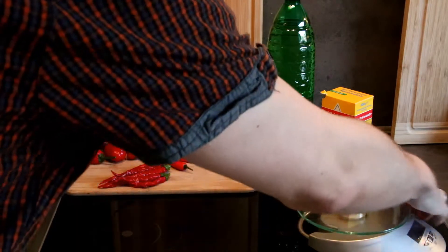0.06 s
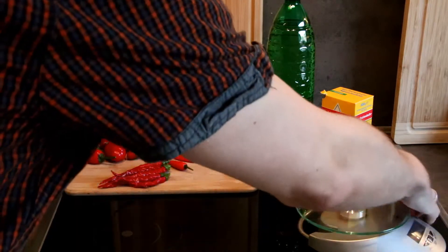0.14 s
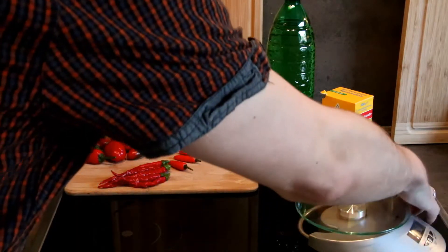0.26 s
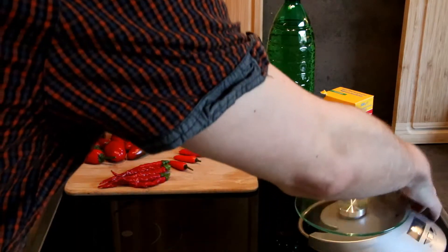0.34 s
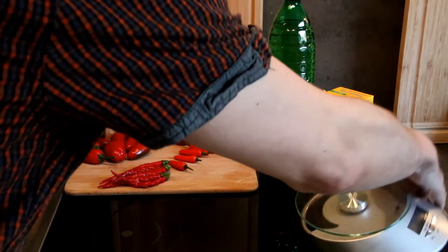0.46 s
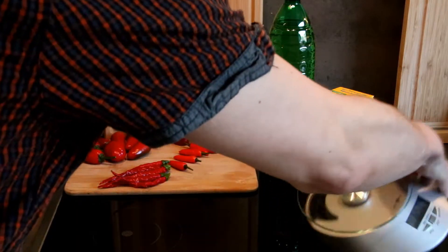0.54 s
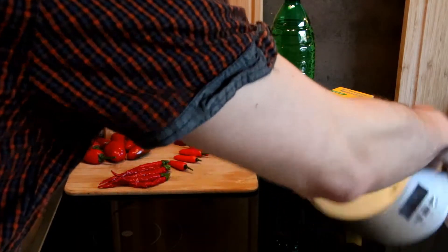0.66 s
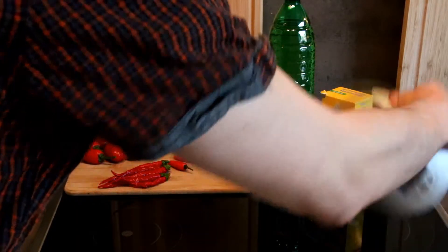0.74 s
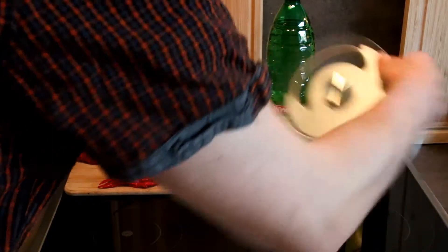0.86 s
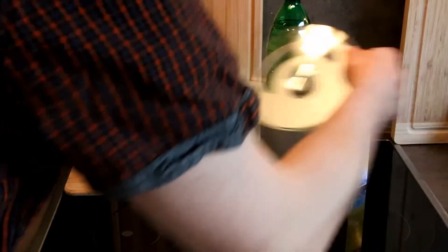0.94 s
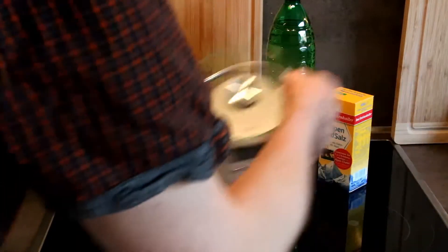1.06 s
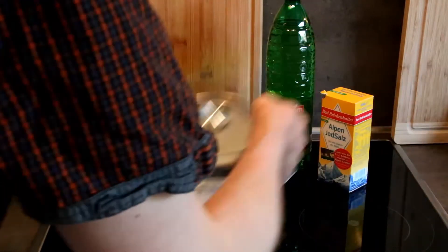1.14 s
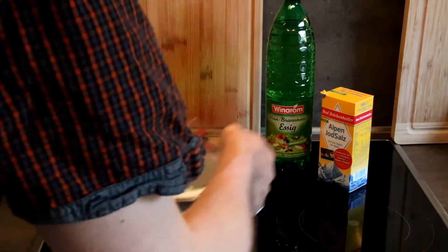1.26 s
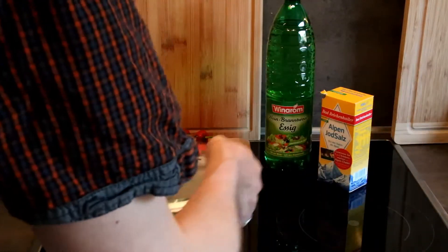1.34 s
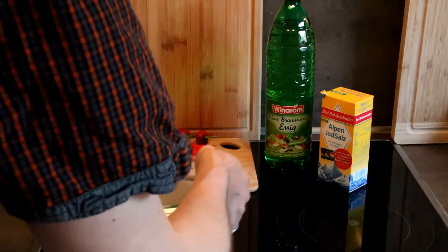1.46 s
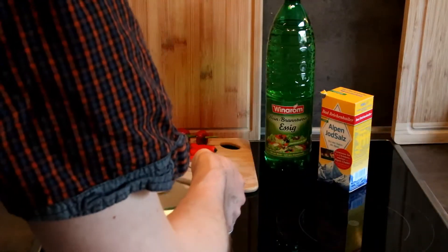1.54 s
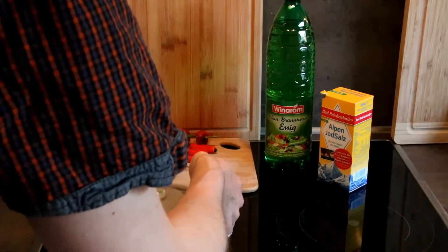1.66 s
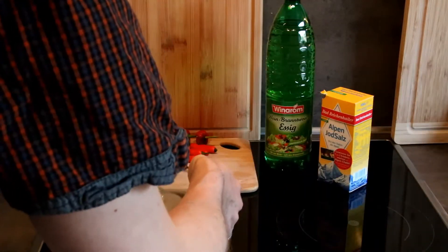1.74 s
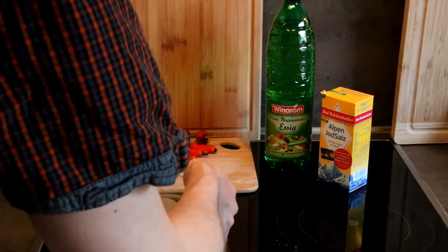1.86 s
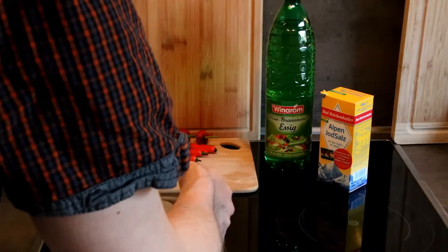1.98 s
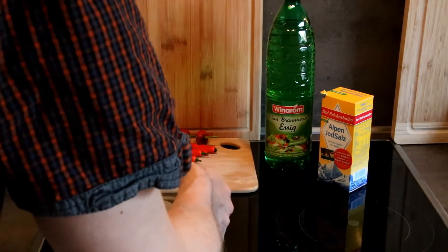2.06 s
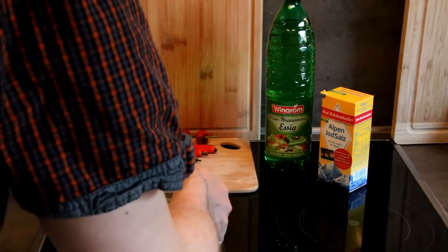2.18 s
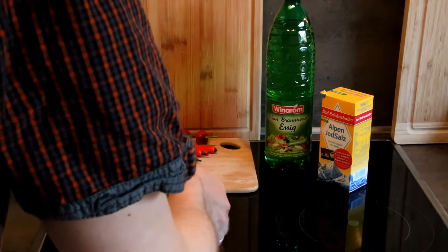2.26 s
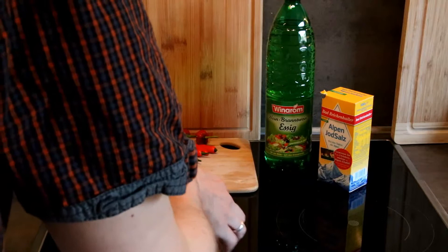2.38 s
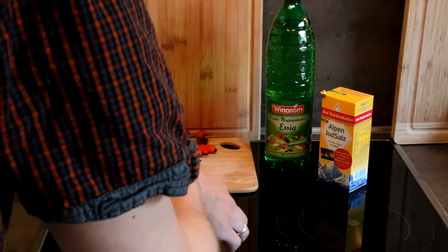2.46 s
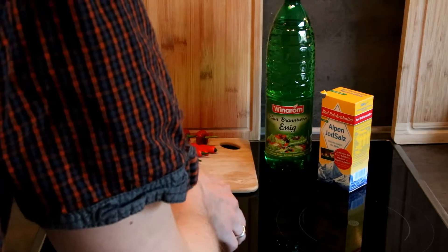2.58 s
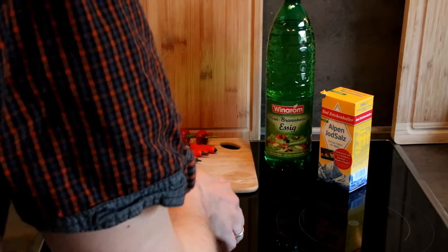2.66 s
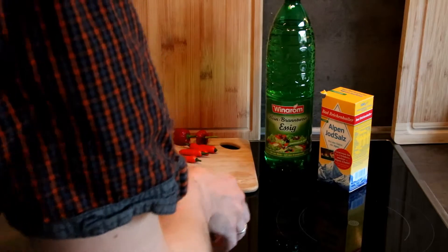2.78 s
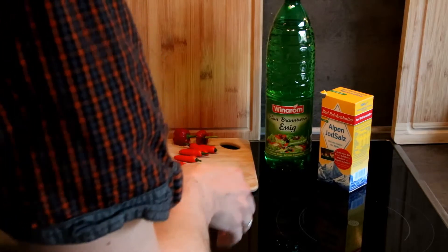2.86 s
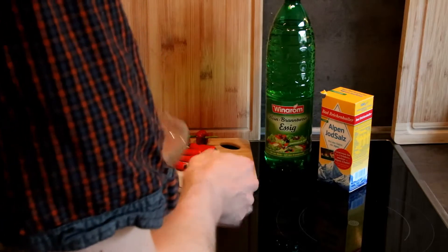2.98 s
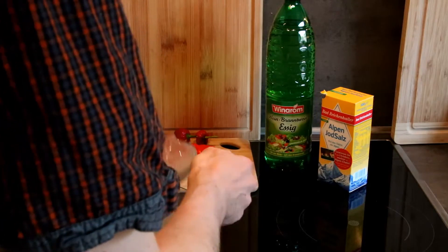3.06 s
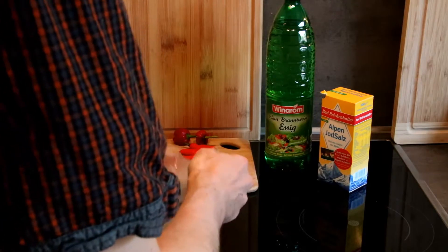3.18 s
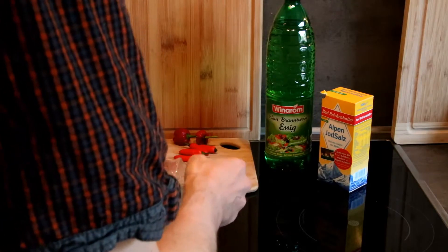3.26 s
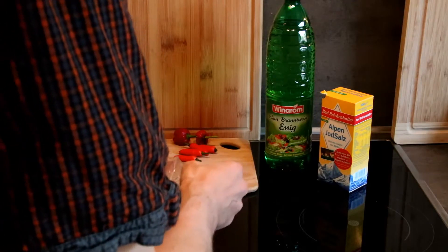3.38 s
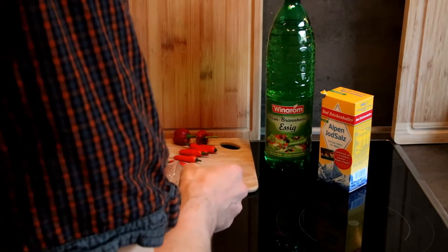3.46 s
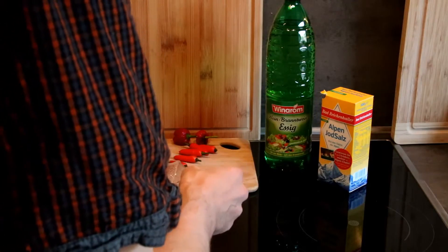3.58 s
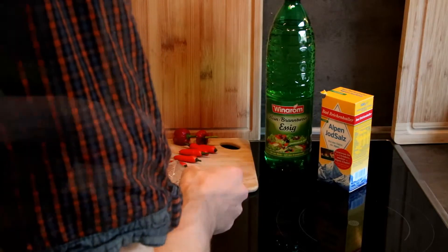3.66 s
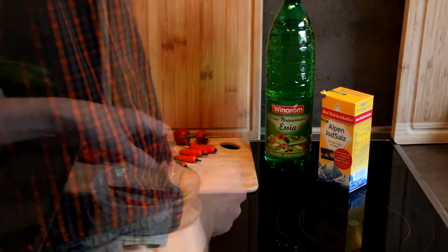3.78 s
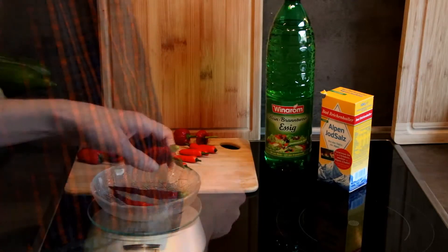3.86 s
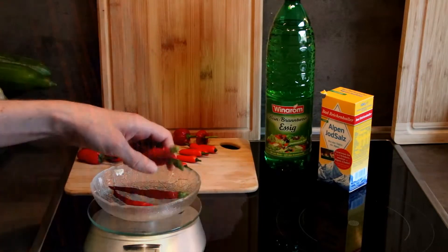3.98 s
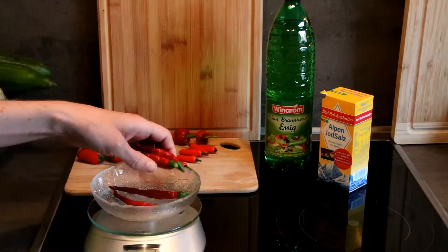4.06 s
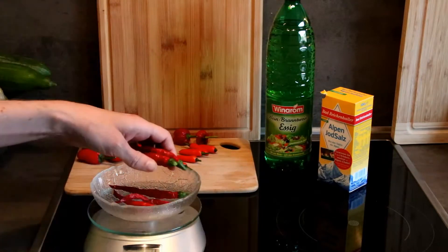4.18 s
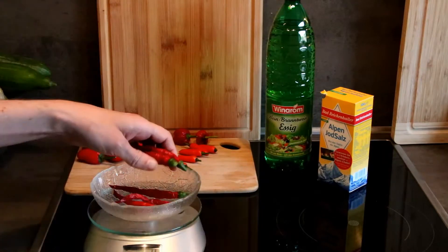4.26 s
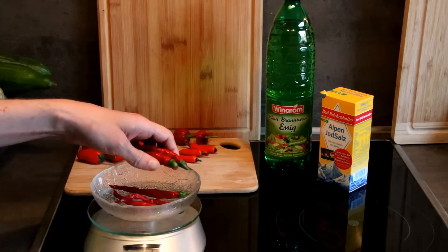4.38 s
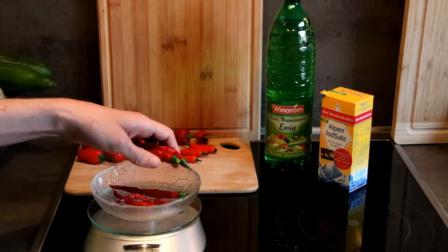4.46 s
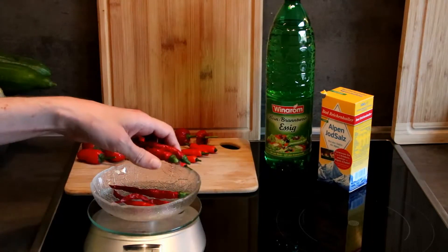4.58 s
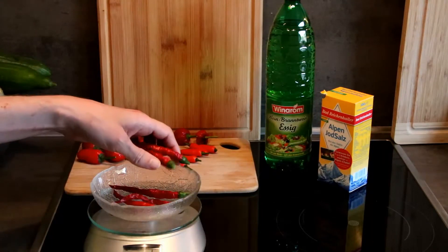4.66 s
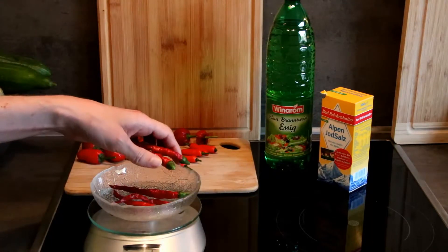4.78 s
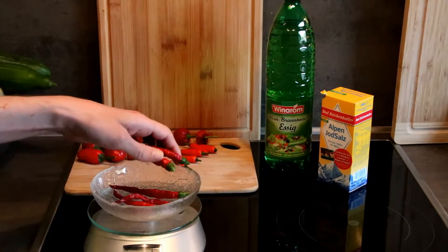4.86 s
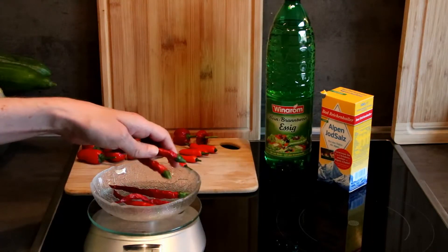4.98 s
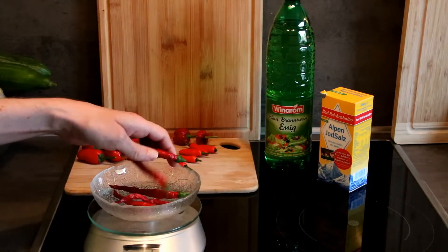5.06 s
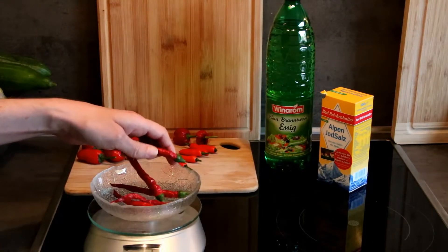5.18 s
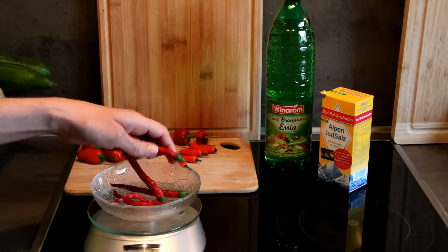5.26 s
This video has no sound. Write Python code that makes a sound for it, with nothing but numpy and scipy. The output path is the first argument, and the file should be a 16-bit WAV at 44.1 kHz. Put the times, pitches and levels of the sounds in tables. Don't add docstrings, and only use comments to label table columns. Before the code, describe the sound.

In a small, hard, quiet kitchen, sleeves rustle as a hand grips and lifts a kitchen scale with dull clunks. Its feet judder in two quick bursts on the glass hob with slight squeaks, then a sharp knock. A glass bowl lands loudly on the glass plate, rocks, buzzes and settles; light chilies tap inside. Close mono microphone, short room echoes.

```python
import sys
import numpy as np
from scipy import signal
from scipy.fft import rfft, irfft, next_fast_len
from scipy.io import wavfile
from scipy.ndimage import uniform_filter1d

SR = 44100
rng = np.random.default_rng(int(sys.argv[2]) if len(sys.argv) > 2 else 0)


def boost(x):
    u = np.asarray(x, float) / 20
    return 10 ** u


def put_to_file(sound):
    columns = np.atleast_2d(sound).T
    safe = np.clip(columns, -1, 1)
    whole_steps = np.round(safe * 32767)
    wavfile.write(sys.argv[1], SR, whole_steps.astype(np.int16))


N = 234727
SPLIT_HZ = 1300

# start_s, peak_db, brightness_db
GRIP_EVENTS = [(0.187, -46, -13), (0.224, -52, -6.5), (0.321, -37, -11.5), (0.334, -39, -17),
               (0.52, -45, -10), (0.536, -19.5, -22.5), (0.571, -34, -11), (0.832, -38.5, -13.5),
               (0.845, -41, -11), (0.966, -55, 3), (1.02, -41.5, -7.5), (1.509, -49, -16)]
LIFT_EVENTS = [
    (0.598, -20.5, -14),
]
TAP_EVENTS = [
    (1.659, -39, -13),
    (2.131, -21, -26),
    (3.077, -42.5, -12),
]
JUDDER_EVENTS = [(1.910, -25, -19), (1.919, -33, -28), (1.926, -22, -28), (1.931, -19.5, -29),
                 (1.934, -15, -35), (1.942, -18, -28), (1.946, -15.5, -31), (1.951, -21, -18.5),
                 (1.961, -29, -37), (1.970, -23.5, -32), (1.996, -42, -35), (2.189, -25.5, -30),
                 (2.193, -30.5, -33), (2.204, -23.5, -21), (2.209, -16, -26), (2.214, -14.5, -20),
                 (2.221, -14, -26.5), (2.227, -18, -25), (2.235, -15, -31), (2.243, -24.5, -22.5),
                 (2.250, -32.5, -23.5), (2.257, -25.5, -9), (2.264, -30.5, -21.5), (2.272, -23, -30),
                 (2.332, -39.5, 2.5)]
SET_DOWN_EVENTS = [
    (2.178, -37, -32),
    (2.3, -36, -32),
    (2.355, -31, -38),
]
SCALE_KNOCK_EVENTS = [
    (2.522, -37.5, -27),
    (2.542, -24, -45.5),
                      (2.547, -17.5, -4),
    (2.556, -13.5, -19),
    (2.951, -47.5, -12),
]
BOWL_LAND_EVENTS = [(3.479, -6, -7), (3.483, -11, -2.5), (3.496, -16, -34), (3.506, -42, -16.5),
                    (3.534, -14, -8.5), (3.56, -19.5, -12), (3.601, -14, -8), (3.655, -37.5, -3),
                    (3.671, -27, -28), (3.707, -28, -14), (3.715, -32.5, -7), (3.75, -42, -3.5),
                    (3.836, -51.5, -5), (4.057, -65.5, -1)]
BOWL_BUZZ_EVENTS = [
    (3.51, -34, 10.5),
    (3.62, -25.5, -13),
    (3.73, -34, 0),
]
CHILI_DROP_EVENTS = [
    (4.137, -52, -6),
                     (4.148, -29.5, -18.5),
    (4.16, -32, -7),
    (4.194, -36, -9.5),
]
CHILI_ROLL_EVENTS = [
    (4.812, -40, -17),
]
SETTLING_EVENTS = [
    (4.642, -70, -24),
    (4.809, -44, -21),
    (4.9, -45, -22),
    (4.99, -52.5, -12),
    (5.137, -50.5, -4.5),
    (5.147, -47, -30.5),
    (5.181, -46, -31),
    (5.22, -51, -16.5),
]

# start_s, hold_s, level_db, grit_db
SQUEAK_EVENTS = [
    (1.943, 0.0072, -47.5, -9),
    (2.186, 0.076, -57.5, -16),
]
# start_s, level_db
THUMP_EVENTS = [(0.32, -54), (0.335, -49.5), (0.573, -56), (1.965, -50), (1.993, -49), (2.066, -43.5),
                (2.128, -57), (2.238, -46), (2.333, -53), (2.522, -56), (2.544, -38.5), (2.687, -49),
                (3.082, -57), (3.478, -31.5), (3.656, -66), (4.198, -49.5), (5.149, -61.5)]
# start_s, level_db, brightness_db
RUSTLE_EVENTS = [(0.02, -61.5, -7), (0.27, -65, -7), (0.42, -60, -10), (0.91, -58.5, -5.5),
                 (1.05, -60.5, -5), (1.72, -65, -7.5), (2.72, -57.5, -2), (2.85, -58, -0.5),
                 (2.98, -62, -4.5), (4.13, -64.5, -8.5), (4.35, -65.5, -19), (4.83, -65, -12.5),
                 (5.16, -68.5, -2.5)]

# pitch_hz, level_db, t60_s
GRIPPED_MODES = [(333, -23, 0.081), (413.4, -3, 0.11), (511, 11, 0.028), (590, 4, 0.02), (700, -8, 0.38),
                 (1060, -21, 0.038), (1550, -80, 0.024)]
HELD_MODES = [(431, -8, .1), (576, -7, .12), (646, -9, .15), (1534, -16, .06), (2300, -20, .08),
              (748, -5, .36), (1055, -21, .2), (1179, -10, .4), (1933, -19, .28), (2891, -24, .3)]
TAPPED_MODES = [(332, -4, 0.25), (466.5, -12.5, 0.051), (580, 2, 0.045), (760, -6.5, 0.075), (903, -3, .07),
                (1050, -3, 0.079), (1370, -9.5, 0.081), (1440, -15.5, 0.05), (1900, -21, .06)]
SLIPPING_MODES = [(240, -9, 0.074), (333, -2.5, 0.083), (409, -6.5, 0.061), (474, 0, 0.083),
                  (594, 3, 0.062), (736, -11.5, 0.16), (810, -3, 0.048), (968, -10, 0.043),
                  (1076, -4.5, .05), (1434, -16, 0.055), (1540, -20, 0.054), (2000, -32.5, .06),
                  (3730, -25.5, 0.069), (6100, -29.5, .03), (9200, -36, .03)]
DRAGGED_MODES = [(248, -8, .1), (325, -8, .1), (470, 0, .1), (583, -1, .08), (738, -8, .25),
                 (834, -10, .08), (960, -10, .08), (1100, -10, .08), (1400, -16, .08), (1600, -20, .1),
                 (1992, -22, .1), (3650, -26, .04), (6040, -23, .035), (6200, -25, .035), (9265, -24, .035),
                 (10330, -42, .025)]
STANDING_MODES = [(257.6, -5, 0.23), (321, 3, 0.1), (432.8, 11, 0.038), (559.5, 7, 0.36), (976, -14.5, 0.4),
                  (1065, -0.5, 0.051), (1343, -16.5, 0.18), (1612, -17, 0.25), (1937, -1, 0.096),
                  (1960, -21.5, 0.52), (2205, -22.5, 0.26), (2570, -30.5, 0.4), (2860, -26, .4),
                  (3370, -30.5, 0.39), (3453, -22, 0.35), (3844, -18, 0.093), (3948, -21, 0.34),
                  (4883, -11, .1), (6170, -8.5, 0.066), (6190, -23, 0.56), (6300, -31, 0.57),
                  (5650, -26.5, .5), (4930, -29.5, 0.32), (7840, -18, 0.036), (10800, -29, 0.22)]
BOWL_ON_PLATE_MODES = [(387, -1, .11), (494, 5, .1), (563, 2, .1), (700, 3, .17), (1070, -12, .085),
                       (1195, -11, .15), (1398, -10, .12), (1425, -9, .12), (1458, -8, .15),
                       (1505, -9, .14), (1635, -11, .12), (1686, -11, .1), (1790, -10, .09),
                       (1903, -16, .1), (2310, -23, .12), (3114, -21, .15), (3250, -24, .083),
                       (3480, -20, .086), (3557, -14, .12), (3690, -16, .12), (3867, -7, .025),
                       (3906, -18, .2), (4050, -17, .08), (4180, -20, .08), (4290, -18, .11),
                       (5500, -20.5, .072), (5630, -32, .19), (6264, -19.5, .047), (6440, -14, .045),
                       (6710, -24.5, .087), (7300, -26, .05), (9420, -20, .04), (10295, -20, .05),
                       (12770, -28, .04), (14030, -33, .04)]
RIM_MODES = [(2267, 0, 1.15)]
BOWL_FILLED_MODES = [(298, -18.5, 0.057), (468, 3, 0.11), (702, 4.5, 0.15), (920, -25, .3),
                     (999, -11.5, 0.59), (1012, -10, 0.36), (1224, -7.5, 0.2), (1871, -4.5, 0.015),
                     (2460, -6, 0.03), (4200, -33.5, 0.12), (3850, -19, 0.15), (4440, -25, 0.1),
                     (5640, -19, 0.11), (6350, -39, 0.25), (6660, -28, 0.41), (8650, -27, .1),
                     (10400, -30.5, 0.35)]
BOWL_SOFT_MODES = [(296, -6, 0.12), (488, -0.5, 0.26), (950, -6, 0.32), (2270, -12, 0.14),
                   (6050, -32, 0.15)]
WORKTOP_MODES = [(32.15, 10, 0.024), (48, 4, 0.024), (62, -10, .1), (107.4, 9, 0.088)]

# pitch_hz, density_db_per_hz
GRIPPED_CROWD = [(71, -29), (120, -25), (303, -11), (480, 2), (778, -6.5), (1080, -16), (1390, 0.5),
                 (12000, -33), (15600, -76), (22000, -120)]
HELD_CROWD = [(88, -76), (150, -37.5), (647, -13), (739, -5), (982, -17.5), (1980, -7.5), (2590, -17),
              (14000, -40)]
DRAGGED_CROWD = [(88, -34), (150, -29), (402, -22), (460, -1.5), (659, -26.5), (1100, -26.5), (1310, -34),
                 (14000, -105)]
STANDING_CROWD = [(88, -45), (150, -2.5), (193, -20.5), (567, -13), (818, -23.5), (1910, -18.5),
                  (6060, -27), (15000, -47)]
PLATE_CROWD = [(88, -58.5), (150, -29.5), (285, -28.5), (500, -3), (708, -9), (790, -25), (1450, -3.5),
               (1980, -14.5), (2310, -11.5), (2500, -18), (3620, -14), (4750, -27), (6600, -22),
               (15500, -50.5)]
FILLED_CROWD = [(88, -51), (150, -13), (698, -28), (828, -14.5), (982, -14), (1410, -19.5), (3930, -13.5),
                (14000, -31)]
SOFT_CROWD = [(88, -41.5), (150, -8), (194, -1.5), (427, -4.5), (485, -3), (1130, -12.5), (3030, -22.5),
              (12000, -53), (15600, -70.5), (22000, -120)]

# pitch_hz, density_db_per_hz
CLOTH_SPECTRUM = [(59, -34), (100, -6), (305, -1), (368, -6), (534, -4), (1120, -9.5), (1850, -3),
                  (3730, -11), (14000, -32)]
HUSH_SPECTRUM = [(15, -47), (25, -15), (48, -24.5), (87, -1), (146, -7.5), (272, 0), (381, -13),
                 (1220, -14.5), (1590, -22.5), (2000, -20), (4030, -23.5), (12300, -28.5), (16000, -60.5),
                 (22000, -120)]
# pitch_hz, t60_s
KITCHEN_T60 = [(100, .55), (400, .5), (1500, .45), (5000, .36), (12000, .22)]
TOP_EDGES_HZ = [12450, 13100, 13800, 14500, 15300, 16300]


def rms_one(x):
    return x / np.sqrt(np.mean(x ** 2) + 1e-20)


def at_hz(points, hz):
    table = np.array(points)
    return np.interp(np.log(hz), np.log(table[:, 0]), table[:, 1])


def band(x, low_hz, high_hz):
    sos = signal.butter(2, [low_hz, min(high_hz, .45 * SR)], "band", fs=SR, output="sos")
    return signal.sosfilt(sos, x)


def drift(rate_hz):
    steps = rng.standard_normal(4000)
    return rms_one(np.interp(np.arange(N) / SR * rate_hz, np.arange(len(steps)), steps))


def swell(s, peak_db, rise_db_per_s, fall_db_per_s, hold_s=0):
    t = np.arange(N) / SR - s
    slope_db = np.minimum(rise_db_per_s * t, -fall_db_per_s * (t - hold_s))
    return boost(peak_db + np.minimum(0, slope_db))


def coloured(spectrum, patchy_db):
    white = rng.standard_normal((2, N))
    edges_hz = 22 * 2 ** np.arange(0, 9.6, .5)
    out = []
    for k, (low, high) in enumerate(zip(edges_hz, edges_hz[1:])):
        hz = np.sqrt(low * high)
        level = boost(at_hz(spectrum, min(hz, 11500)) + patchy_db * drift(33))
        out.append((hz, level * band(white[k % 2], low, high)))
    return out


def ring(force, modes, damping=1.0, even=False):
    out = np.zeros(len(force))
    head = force[:np.flatnonzero(np.abs(force) > 1e-4)[-1] + 1]
    for k, (hz, level_db, t60_s) in enumerate(modes):
        r = boost(-60 * damping / (max(t60_s, .01) * SR))
        w = 2 * np.pi * hz / SR
        share = np.abs(head @ np.exp(-1j * w * np.arange(len(head)))) + .45 if even else 1
        sine = signal.lfilter([0, np.sin(w)], [1, -2 * r * np.cos(w), r * r], force)
        out += (-1) ** k * boost(level_db) / share * sine
    return out


def crowd_noise(spectrum, size):
    hz = np.maximum(np.arange(size // 2 + 1) * SR / size, 1)
    shape = boost(at_hz(spectrum, hz)) * rfft(rng.standard_normal(size))
    return [rms_one(irfft(shape * side, size)) for side in (hz < SPLIT_HZ, hz >= SPLIT_HZ)]


def dying(power, t60_s):
    return np.sqrt(signal.lfilter([1], [1, -boost(-120 / (t60_s * SR))], power))


def touches(events, ms, weight_db):
    return [(s, db, db + weight_db, bright_db, ms) for s, db, bright_db in events]


def contacts(events, modes, crowd, body_db, crowd_db, crowd_t60, damping, floor_hz, size=SR // 2):
    out, t = np.zeros((2, N)), np.arange(size) / SR
    push = np.sin(np.pi * np.minimum(t / 0.001, 1)) ** 2 / (0.0014 * SR)
    worktop = ring(push + 1e-18, WORKTOP_MODES)
    low = [m for m in modes if m[0] < SPLIT_HZ]
    high = [m for m in modes if m[0] >= SPLIT_HZ]
    soft = signal.butter(4, 2200, fs=SR, output="sos")
    walls = signal.butter(1, 7000, fs=SR)
    above_floor = signal.butter(4, floor_hz, "high", fs=SR, output="sos")
    for s, peak_db, thud_db, bright_db, ms in events:
        force = rng.standard_normal(size) * np.abs(rng.standard_normal(size))
        force = force * (1 - np.exp(-t / 0.000083)) * np.exp(-2 * (t * 1000 / max(ms, 1)) ** 2)
        force = force / np.sqrt(np.sum(force ** 2)) + 1e-18

        clear = signal.sosfilt(soft, ring(force, low, damping, even=True))
        clear = clear + boost(bright_db + 16.5) * ring(force, high, damping, even=True)

        direct = dying(force ** 2, crowd_t60)
        late = direct ** 2 / np.sum(direct ** 2) * boost(2 * -13.5)
        dull, sharp = crowd_noise(crowd, size)
        dull = signal.sosfilt(soft, dull * (direct + dying(late, 0.46)))
        echo = signal.lfilter(*walls, sharp[::-1])
        sharp = sharp * direct + echo * dying(late, 0.52)

        clear, dull = signal.sosfilt(above_floor, [clear, dull])
        thud = boost(thud_db + 1.5) * worktop
        at = int(s * SR)
        out[0, at:at + size] += (boost(peak_db + body_db) * clear + thud)[:N - at]
        out[1, at:at + size] += (boost(peak_db + crowd_db) * (dull + boost(bright_db + 8.5) * sharp))[:N - at]
    return out


def hush():
    air = sum(x for hz, x in coloured(HUSH_SPECTRUM, patchy_db=.4))
    return boost(-71 - 4.5) * rms_one(air)


def rustle():
    rise_db_per_s, dull_fall_db_per_s, bright_fall_db_per_s = 68.5, 23.5, 32
    rest_db, rest_bright_db = -72.5, -4.5
    bands = coloured(CLOTH_SPECTRUM, patchy_db=2.2)
    dull = rms_one(sum(x for hz, x in bands if hz < SPLIT_HZ))
    bright = rms_one(sum(x for hz, x in bands if hz >= SPLIT_HZ))
    low = np.max([swell(s, db, rise_db_per_s, dull_fall_db_per_s)
                  for s, db, _ in RUSTLE_EVENTS], axis=0)
    high = np.max([swell(s, db + lift_db, rise_db_per_s, bright_fall_db_per_s)
                   for s, db, lift_db in RUSTLE_EVENTS], axis=0)
    return (boost(-1.5) * np.maximum(low, boost(rest_db)) * dull
            + boost(-2.0) * np.maximum(high, boost(rest_db + rest_bright_db)) * bright)


def scale_gripped():
    return contacts(touches(GRIP_EVENTS, ms=7.9, weight_db=-30), GRIPPED_MODES, GRIPPED_CROWD,
                    body_db=-9.0, crowd_db=-18.5, crowd_t60=0.12, damping=1.25, floor_hz=135, size=SR // 3)


def thumps():
    force, push = np.zeros(N), np.hanning(200)
    for s, db in THUMP_EVENTS:
        at = int(s * SR)
        force[at:at + len(push)] += boost(db + 60) * push
    return boost(-106) * ring(force + 1e-18, WORKTOP_MODES)


def scale_lifted():
    return contacts(touches(LIFT_EVENTS, ms=3.4, weight_db=-27.5), HELD_MODES, HELD_CROWD,
                    body_db=-9.5, crowd_db=-10.5, crowd_t60=0.071, damping=1, floor_hz=149)


def scale_tapped():
    return contacts(touches(TAP_EVENTS, ms=2.2, weight_db=-30), TAPPED_MODES, DRAGGED_CROWD,
                    body_db=-10.5, crowd_db=-18, crowd_t60=0.15, damping=1.2, floor_hz=159.4, size=SR // 3)


def feet_judder():
    return contacts(touches(JUDDER_EVENTS, ms=1.2, weight_db=-51), SLIPPING_MODES, DRAGGED_CROWD,
                    body_db=-8, crowd_db=-17.5, crowd_t60=0.033, damping=2.0, floor_hz=199, size=SR // 4)


def feet_squeak():
    rise_db_per_s, fall_db_per_s, slips_per_s = 814, 369.5, 6000
    grains = rng.standard_normal(N) * boost(1.6 * rng.exponential(1, N))
    grains = grains * (rng.random(N) < slips_per_s / SR)
    upper = [m for m in DRAGGED_MODES if m[0] >= 3000]
    scrape = rms_one(band(grains, 1400, 5400))
    sound = rms_one(rms_one(ring(grains, upper)) + boost(4.5) * scrape)
    grit = rms_one(band(grains, 8200, 13000))
    return sum((sound + boost(grit_db) * grit) * swell(s, db, rise_db_per_s, fall_db_per_s, hold_s)
               for s, hold_s, db, grit_db in SQUEAK_EVENTS)


def scale_set_down():
    return contacts(touches(SET_DOWN_EVENTS, ms=9.7, weight_db=-56), DRAGGED_MODES, DRAGGED_CROWD,
                    body_db=-8.5, crowd_db=-19.5, crowd_t60=0.044, damping=0.64, floor_hz=160)


def scale_knocked():
    return contacts(touches(SCALE_KNOCK_EVENTS, ms=4.37, weight_db=-23.5),
                    STANDING_MODES, STANDING_CROWD,
                    body_db=-10.0, crowd_db=-15.5, crowd_t60=0.041, damping=2.53, floor_hz=180.8)


def bowl_lands():
    return contacts(touches(BOWL_LAND_EVENTS, ms=6.23, weight_db=-20), BOWL_ON_PLATE_MODES, PLATE_CROWD,
                    body_db=-10, crowd_db=-14.5, crowd_t60=0.042, damping=1.88, floor_hz=246.3)


def rim():
    force, s = np.full(N, 1e-18), BOWL_LAND_EVENTS[0][0]
    force[int(s * SR)] = 1
    height = swell(s, -36.5, rise_db_per_s=1e4, fall_db_per_s=130, hold_s=0.31)
    return ring(force, RIM_MODES, damping=1) * height


def bowl_buzzes():
    modes = [m for m in BOWL_ON_PLATE_MODES if m[0] < 8000]
    return contacts(touches(BOWL_BUZZ_EVENTS, ms=43, weight_db=-40.5), modes, PLATE_CROWD,
                    body_db=-17.5, crowd_db=-13, crowd_t60=0.047, damping=3.9, floor_hz=250)


def chilies_drop():
    return contacts(touches(CHILI_DROP_EVENTS, ms=2.1, weight_db=-34),
                    BOWL_FILLED_MODES, FILLED_CROWD,
                    body_db=-10.5, crowd_db=-14.5, crowd_t60=0.044, damping=1.6, floor_hz=200)


def chilies_settle():
    events = touches(CHILI_ROLL_EVENTS, ms=143, weight_db=-33) + touches(SETTLING_EVENTS, ms=7.0, weight_db=-19.0)
    return contacts(events, BOWL_SOFT_MODES, SOFT_CROWD,
                    body_db=-18.5, crowd_db=-12, crowd_t60=0.066, damping=0.81, floor_hz=150, size=SR // 3)


def kitchen(x):
    t, edges_hz = np.arange(SR) / SR, 40 * 2 ** np.arange(0, 9, .7)
    white = rng.standard_normal(SR)
    tail = sum(band(white, a, b) * boost(-60 * t / at_hz(KITCHEN_T60, np.sqrt(a * b)))
               for a, b in zip(edges_hz, edges_hz[1:]))
    tail = tail * (1 - np.exp(-t / 0.0019))
    return signal.fftconvolve(x, tail / np.sqrt(np.sum(tail ** 2)))[:N]


def scene():
    scale = (scale_gripped() + scale_lifted() + scale_tapped() + feet_judder()
             + scale_set_down() + scale_knocked())
    bowl = bowl_lands() + bowl_buzzes() + chilies_drop() + chilies_settle()
    clear, crowd = scale + bowl
    clear = clear + feet_squeak() + thumps()
    echoes = boost(-8.5) * kitchen(clear)
    return (clear + echoes + crowd + rim() + rustle() + hush())[None]


def roll_off(x):
    return signal.sosfilt(signal.butter(12, 16530, fs=SR, output="sos"), x)


def record(dry):
    size = next_fast_len(N)
    spectrum, hz = rfft(dry, size), np.arange(size // 2 + 1) * SR / size
    below = [np.clip((edge_hz - hz) / 120 + .5, 0, 1) for edge_hz in TOP_EDGES_HZ]
    out = irfft(spectrum * below[0], size)
    for k, (under, over) in enumerate(zip(below, below[1:])):
        top = irfft(spectrum * (over - under), size)
        gate_db = -99.5 + 1.5 * k ** 1.5
        loud_enough = uniform_filter1d(top ** 2, size=1000) > boost(2 * gate_db)
        out = out + top * uniform_filter1d(loud_enough * 1.0, size=300)
    return roll_off(out[:, :N])


dry = scene()
out = record(dry)
put_to_file(out)
```